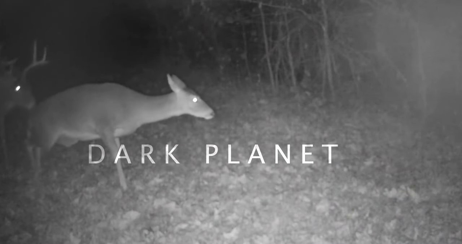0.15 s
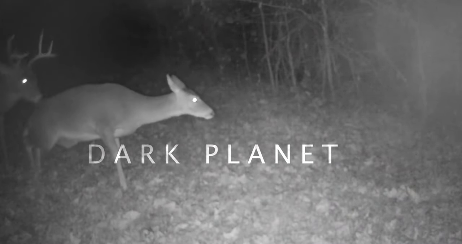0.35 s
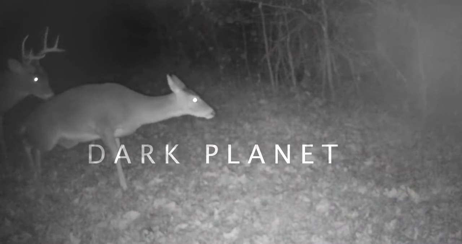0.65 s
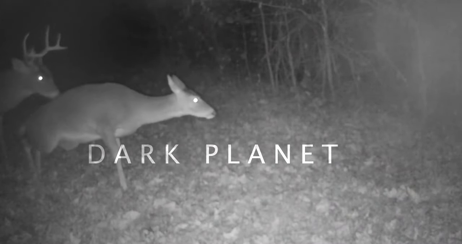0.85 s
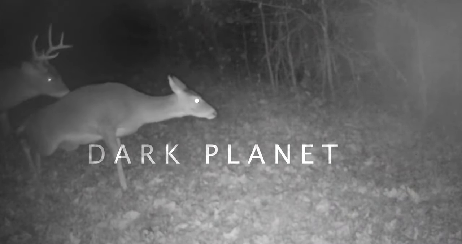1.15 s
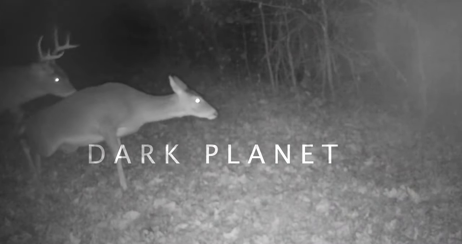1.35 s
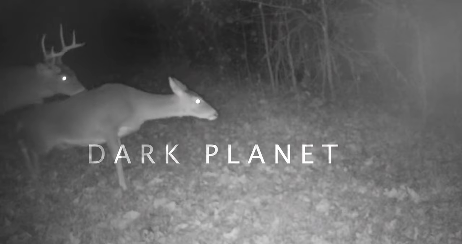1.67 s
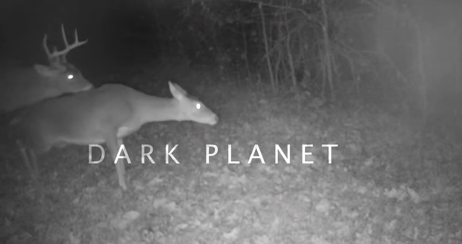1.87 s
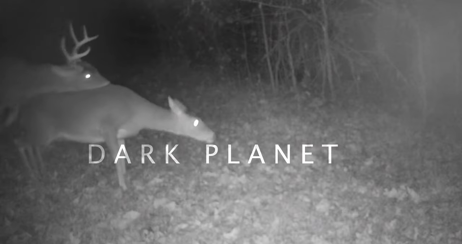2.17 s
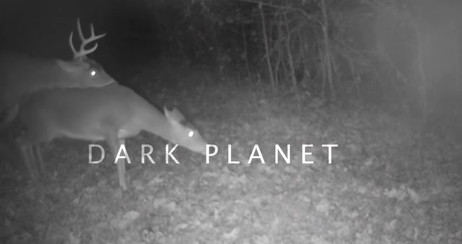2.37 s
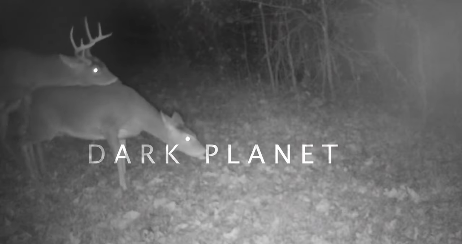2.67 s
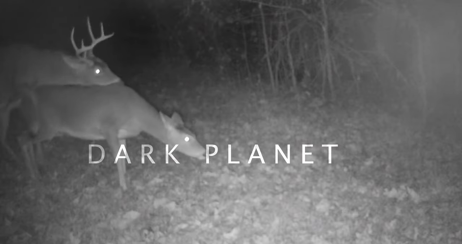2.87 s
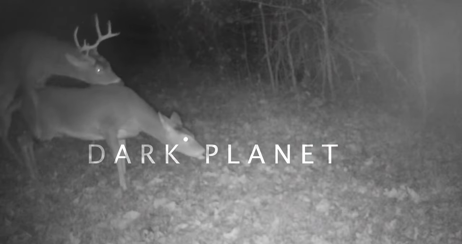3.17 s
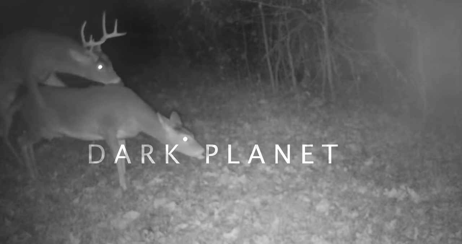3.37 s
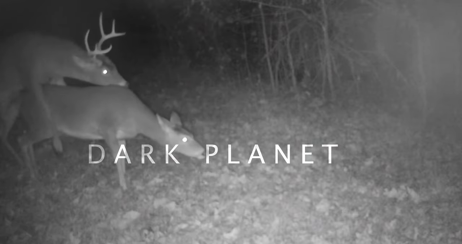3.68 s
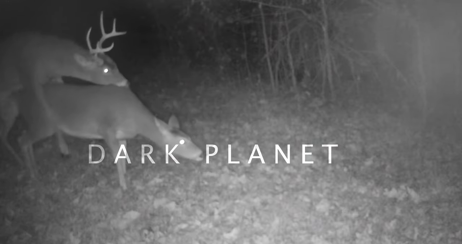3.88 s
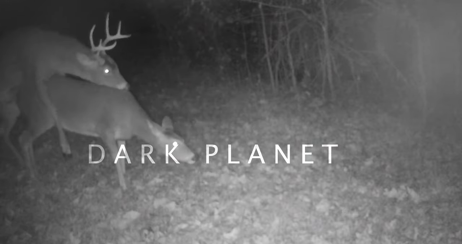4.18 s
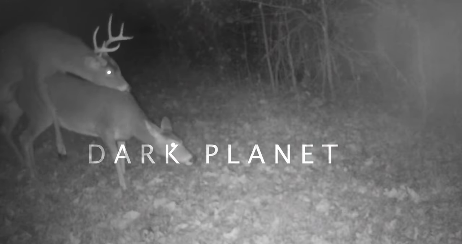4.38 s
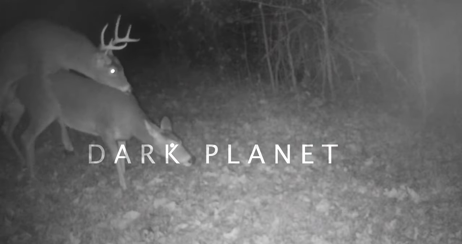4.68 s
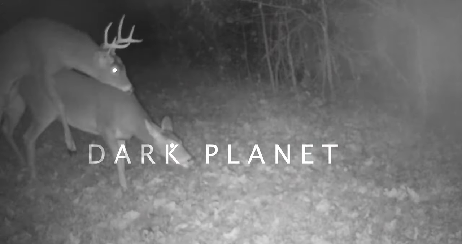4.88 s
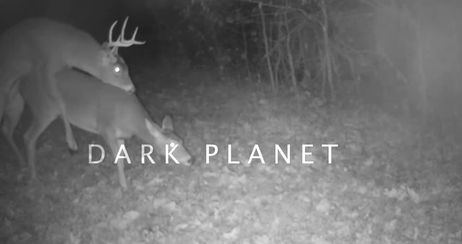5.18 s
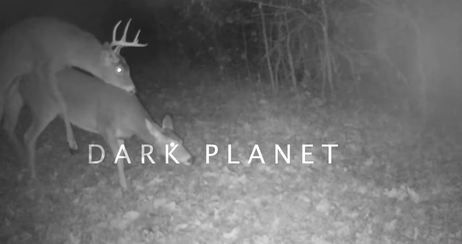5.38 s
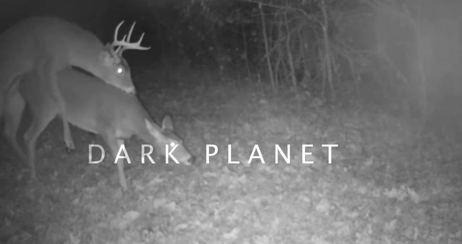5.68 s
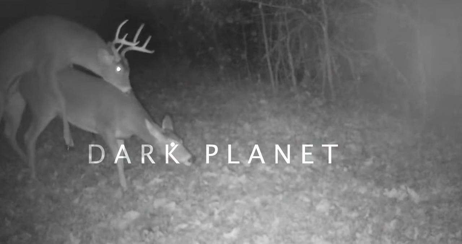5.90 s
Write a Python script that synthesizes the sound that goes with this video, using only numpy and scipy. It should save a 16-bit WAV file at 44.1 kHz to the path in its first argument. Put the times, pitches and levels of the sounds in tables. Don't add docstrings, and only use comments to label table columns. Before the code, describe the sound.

Close, dry, brittle leaf crunches from deer hooves in open woodland, caught by a cheap, bright microphone that distorts on the loudest crunches. Drags and abrupt treads come in uneven clusters, with snapping leaves, cracking twigs and small settling ticks. Activity swells around the middle, drops to a long lull, then returns briefly. Constant preamp hiss, soft rumble and a faint pure electronic tone lie underneath.

```python
import sys
import numpy as np
from scipy import signal
from scipy.fft import rfft, irfft, next_fast_len
from scipy.io import wavfile
from scipy.ndimage import map_coordinates

SR = 44100
rng = np.random.default_rng(int(sys.argv[2]) if len(sys.argv) > 2 else 0)


def magnitude_from_level(level_db):
    exponent = np.asarray(level_db, float) / 20
    return 10 ** exponent


def put_to_file(sound):
    columns = np.atleast_2d(sound).T
    safe = np.clip(columns, -1, 1)
    whole_steps = np.round(safe * 32767)
    wavfile.write(sys.argv[1], SR, whole_steps.astype(np.int16))


N = 266570


def unit(x):
    return x / np.sqrt(np.mean(x ** 2) + 1e-20)


def along(points, hz):
    point_hz, value = np.transpose(points)
    return np.interp(np.log(hz + 1), np.log(point_hz + 1), value)


def wobble(rate_hz):
    knots = rng.standard_normal(int(N * rate_hz / SR) + 4)
    return map_coordinates(knots, [np.arange(N) * rate_hz / SR])


def coloured(x, gain):
    n = x.shape[-1]
    m = 2 * next_fast_len(n // 2 + 1024)
    cepstrum = irfft(np.log(gain(np.fft.rfftfreq(m, 1 / SR)) + 1e-6), m)
    cepstrum[..., 1:m // 2] *= 2
    cepstrum[..., m // 2 + 1:] = 0
    response = np.exp(rfft(cepstrum))
    return irfft(rfft(x, m) * response, m)[..., :n]


def place(start_s, sounds):
    where = (start_s * SR).astype(int) + np.arange(sounds.shape[-1])
    return np.bincount(where.ravel(), sounds.ravel(), minlength=N)[:N]


# freq_hz, density_db_per_hz
HISS_SPECTRUM = [(12, -20), (25, 3), (40, -2.5), (70, -5), (120, -4), (200, -12.5), (400, -15.5),
                 (1000, -19.5), (2000, -29.5), (4000, -24), (6000, -27), (10000, -25.5)]


def camera():
    hiss_db, whine_db, whine_hz = -36, -42.5, 5223.4
    hiss = unit(coloured(rng.standard_normal(N), lambda hz: magnitude_from_level(along(HISS_SPECTRUM, hz))))
    whine = np.sqrt(2) * np.sin(2 * np.pi * whine_hz * np.arange(N) / SR)
    return magnitude_from_level(hiss_db + 0.52 * wobble(2.4)) * hiss + magnitude_from_level(whine_db) * whine


# freq_hz, density_db_per_hz
LEAF_SPECTRUM = [(60, -72), (200, -12.5), (500, -7), (1200, -8.5), (2800, -7.5), (3700, -2), (4500, 0),
                 (5400, -3.5), (7000, -9), (9000, -2.5)]
EDGES_HZ = [1125, 2720, 7000]


def leaf_bands(hz):
    over = [1 / (1 + (edge_hz / (hz + 1)) ** 12) for edge_hz in EDGES_HZ]
    shares = np.array([1 - over[0], over[0] - over[1], over[1] - over[2], over[2]])
    gains = magnitude_from_level(along(LEAF_SPECTRUM, hz)) * np.sqrt(np.abs(shares))
    return gains / np.sqrt(np.mean(gains ** 2, axis=1, keepdims=True))


# start_s, peak_db
TICKS = [(0.3834, -16.5), (0.777, -23), (0.859, -21), (0.9177, -17), (1.228, -17.5), (1.8635, -20.5),
         (1.8705, -17.5), (2.3925, -13), (2.7657, -19), (3.0688, -24), (3.098, -20), (3.132, -23.5),
         (3.781, -15), (3.809, -15), (3.853, -15), (3.9658, -20), (4.1785, -28), (4.3, -26), (4.375, -20),
         (4.4137, -24), (4.4672, -30), (4.5286, -30), (4.862, -29), (4.9, -30), (4.9413, -27),
         (5.0825, -26), (5.1542, -21), (5.833, -20), (5.98, -22)]
# start_s, peak_db, ring_hz, dull_db
TWIGS = [(0.351, -20, 1700, -1), (0.4424, -12.5, 1250, -3), (0.4618, -20, 3880, 1),
         (0.5332, -22.5, 3570, 2), (1.828, -20.5, 1320, 5), (2.5844, -15, 4480, -6), (2.7244, -12, 950, 6),
         (2.781, -21, 1790, 0), (2.802, -19, 900, 4), (2.8153, -13, 2500, -5), (2.8609, -9.5, 754, 4),
         (4.0632, -25, 2760, -8), (4.2807, -24.5, 900, -1), (4.748, -24.5, 3230, 0)]
# start_s, peak_db, ring_hz, life_ms
SNAPS = [(0.0454, -10, 4820, 14), (0.0541, -8.5, 3270, 12), (0.0803, 1.5, 4430, 5), (0.1, -11, 3830, 8),
         (0.1297, -7, 3400, 5.2), (0.1438, -6, 4820, 5.2), (0.2013, -6.5, 5100, 19), (0.2293, -5, 4520, 22),
         (0.9705, -17, 4370, 6.5), (0.9794, -11.5, 4650, 17), (1.06, -11.5, 4300, 8),
         (2.0462, -10, 3550, 25), (2.0714, 0, 4660, 5.1), (2.0822, -17, 3600, 7), (2.6045, -3.5, 4570, 14),
         (3.4292, -3.5, 5030, 12), (3.5441, -4, 4310, 15), (3.573, -5.5, 4400, 7), (3.583, -4, 4950, 9.8),
         (3.5994, -3, 4480, 8.5), (3.6517, -10, 4130, 8), (3.6911, -4.5, 4180, 13), (3.7641, -10, 4520, 12),
         (3.7737, -4.5, 3950, 5.7), (3.8956, -10, 4350, 8), (5.6537, -13, 4690, 7.7),
         (5.673, -14, 4520, 11), (5.7319, -12, 4600, 13), (5.7658, -16, 3960, 16), (5.8259, -3.5, 2520, 11)]


def breaks():
    snap_dull_db, snap_bright_db = -16.5, -11
    twig_bright_db, twig_life_ms = -26, 11
    tick_dull_db, tick_bright_db = -16.5, -9.5
    tick_hz, tick_spread = 4130, 0.08
    tick_life_ms, life_scatter_db = 11, 6
    colour_scatter_db = -1.5

    rows = [(s, db, hz, snap_dull_db, snap_bright_db, ms) for s, db, hz, ms in SNAPS]
    rows += [(*twig, twig_bright_db, twig_life_ms) for twig in TWIGS]
    for start_s, peak_db in TICKS:
        ring_hz = tick_hz * np.exp(tick_spread * rng.standard_normal())
        life_ms = tick_life_ms * magnitude_from_level(life_scatter_db * rng.standard_normal())
        rows.append((start_s, peak_db, ring_hz, tick_dull_db, tick_bright_db, life_ms))

    start_s, peak_db, ring_hz, dull_db, bright_db, life_ms = np.transpose(rows)[..., None]
    dull_db = dull_db + colour_scatter_db * rng.standard_normal(dull_db.shape)
    bright_db = bright_db + colour_scatter_db * rng.standard_normal(bright_db.shape)
    return start_s, peak_db, ring_hz, dull_db, bright_db, life_ms


def snaps():
    start_s, peak_db, ring_hz, dull_db, bright_db, life_ms = breaks()
    t = np.arange(SR // 20) / SR
    rattle = magnitude_from_level(-60 * t / (life_ms / 1000))
    scatter = magnitude_from_level(-24 - 60 * t / 0.034)
    bursts = (rattle + scatter) * rng.standard_normal((len(start_s), len(t)))
    bursts[:, 0] += 1.8

    def ringing_bands(hz):
        detune = (hz - ring_hz) / (0.05 * ring_hz)
        ring = 1 + 3 / np.sqrt(1 + detune ** 2)
        return ring * leaf_bands(hz)[:, None]

    parts = coloured(bursts, ringing_bands)
    parts /= np.linalg.norm(parts, axis=-1, keepdims=True)
    band_db = np.array([dull_db - 12, dull_db - 0.5, np.zeros_like(dull_db), bright_db])
    sound = np.sum(magnitude_from_level(band_db) * parts, axis=0)
    sound *= magnitude_from_level(peak_db + 1) / np.abs(sound).max(axis=1, keepdims=True)
    return place(start_s + 0.5 / SR, sound)


def cracks(rate_hz, spread_db, t60_s):
    size_db = np.minimum(spread_db * rng.exponential(size=N), 7)
    hits = (rng.random(N) < rate_hz / SR) * magnitude_from_level(2 * size_db)
    power = signal.lfilter([1], [1, -magnitude_from_level(-120 / (t60_s * SR))], hits)
    return power / power.mean()


def flakes(count, cycles, spread_db):
    when, pitch, size = rng.random((count, 3)).T[..., None]
    hz = 700 + 9000 * pitch
    turns = hz * np.arange(SR // 200) / SR
    size_db = -spread_db * np.log(1 - 0.97 * size)
    decay = magnitude_from_level(size_db - 60 * turns / cycles)
    flicks = decay * np.sqrt(hz) * np.sin(2 * np.pi * turns)
    return unit(place(when * N / SR, flicks))


LAYER_DB = [-16.5, -10, -1.5, -11]
LAYER_PER_DEPTH = [-0.059, 1.0, -0.075, 0.33]


def stirred(t, rows, rise_db_s, fall_db_s):
    settle_db, settle_fall_db_s = -12, 53.5
    start_s, held_s, crackle_db, depth_db, weight_db = np.transpose(rows)[..., None]
    before_s = np.maximum(start_s - t, 0)
    after_s = np.maximum(t - start_s - held_s, 0)
    fall = magnitude_from_level(-2 * fall_db_s * after_s) + magnitude_from_level(2 * (settle_db - settle_fall_db_s * after_s))
    power = magnitude_from_level(2 * (crackle_db - rise_db_s * before_s)) * fall
    layers_db = LAYER_DB + depth_db * LAYER_PER_DEPTH + weight_db * [1, 0, 0, 0]
    return magnitude_from_level(2 * layers_db).T @ power


# start_s, held_s, crackle_db, depth_db
DRAGS = [(0.0, 0.051, -23, -2), (0.075, 0.073, -20, -1), (0.16, 0.063, -24.5, -0.5),
         (0.255, 0.051, -27.5, -1), (0.36, 0.19, -38.5, -2), (0.9, 0.073, -31, 0),
         (0.975, 0.046, -27.5, 0.5), (1.05, .17, -30.5, -0.5), (1.27, 0.15, -39, 0), (1.47, .04, -31, 0.5),
         (1.53, 0.19, -36, -1.5), (1.75, 0.11, -38.5, 4), (1.9, 0.15, -33, 1.5), (2.1, 0.045, -25, 1.5),
         (2.19, 0.21, -31, 1.5), (2.39, 0.15, -28.5, -0.5), (2.63, 0.044, -30.5, -2),
         (2.745, .075, -26.5, 3), (2.89, .17, -26.5, -0.5), (3.37, .04, -24, 0), (3.411, .16, -19.5, -2),
         (3.64, 0.033, -22, 2.5), (3.71, 0.065, -29.5, 4), (3.86, 0.05, -36, -4), (4.24, 0.18, -43, 2.5),
         (4.87, 0.11, -48, 3.5), (5.515, 0.022, -30, 1), (5.55, 0.042, -27.5, 5), (5.62, 0.12, -20.5, -4),
         (5.84, 0.068, -36, 1)]
# start_s, held_s, crackle_db, depth_db, soil_weight_db
TREADS = [(0.095, 0.022, -19.5, 1.5, -1), (2.022, 0.011, -21, 2.5, 0.5), (2.044, 0.036, -16, 3, -0.5),
          (2.605, .015, -26.5, 2, 6), (2.707, 0.02, -21, 3.5, 3.5), (2.76, 0.011, -24, 4.5, 2),
          (3.525, 0.017, -20, 0, 3), (3.599, 0.022, -13, -0.5, 3), (3.621, .009, -9, 1.5, 2.5),
          (3.636, 0.01, -16.5, -5, 1), (3.684, 0.01, -17.5, 2.5, 4.5), (3.805, 0.0095, -32, -2, 10.5),
          (5.542, 0.0062, -29, 4, 0), (5.762, 0.011, -22.5, -0.5, -1.5), (5.62, 0.016, -25, 7, 2),
          (5.648, 0.025, -21.5, 4.5, -5), (5.727, 0.017, -20, 4, -1), (5.79, 0.018, -41, 4, -2)]


def hooves(t):
    still_db, still_depth_db = -46, 7.5
    soil_drag_db = -1
    still = stirred(t, [(0, t[-1], still_db, still_depth_db, still_depth_db)], 0, 0)
    drag_rows = [(*row, row[-1] + soil_drag_db) for row in DRAGS]
    drags = stirred(t, drag_rows, rise_db_s=263, fall_db_s=278.5)
    treads = stirred(t, TREADS, rise_db_s=1400, fall_db_s=500)
    return 10 * np.log10(still + drags + treads)


def rustle():
    t = np.arange(0, N / SR, 1 / 1000)
    levels_db = hooves(t)
    shared = cracks(rate_hz=900, spread_db=5.5, t60_s=0.0059)
    flicks = flakes(count=11000, cycles=7.2, spread_db=4)
    clumps_db = 0.5 * wobble(40) + 0.6 * wobble(130) + 0.6 * wobble(28)
    smooth_shares = [0.49, 0.88, 0.79, 1.0]
    patches_db = [1.5, 1.0, 0.56, 1.6]
    layers = []
    for level_db, smooth, patchy_db in zip(levels_db, smooth_shares, patches_db):
        scrape = np.sqrt(smooth + (1 - smooth) * shared) * rng.standard_normal(N)
        litter = (scrape + 0.39 * flicks) * magnitude_from_level(clumps_db + patchy_db * wobble(25.15))
        level = magnitude_from_level(np.interp(np.arange(N) / SR, t, level_db))
        layers.append(level * unit(litter))
    parts = coloured(np.array(layers), leaf_bands)
    parts[0] *= magnitude_from_level(-0.12)
    return parts.sum(axis=0)


def scene():
    return (camera() + snaps() + rustle())[None]


def band_limit(x):
    return signal.sosfilt(signal.butter(12, 15800, fs=SR, output="sos"), x)


def record(dry):
    cut_hz, slope_hz = 9980, 200
    m = next_fast_len(N + 4096)
    edge = np.clip((cut_hz + 250 - np.fft.rfftfreq(m, 1 / SR)) / slope_hz, 0, 1)
    narrow = irfft(rfft(dry, m) * edge ** 2, m)[:, :N]
    return band_limit(np.clip(narrow, -1, 1))


dry = scene()
out = record(dry)
put_to_file(out)
```